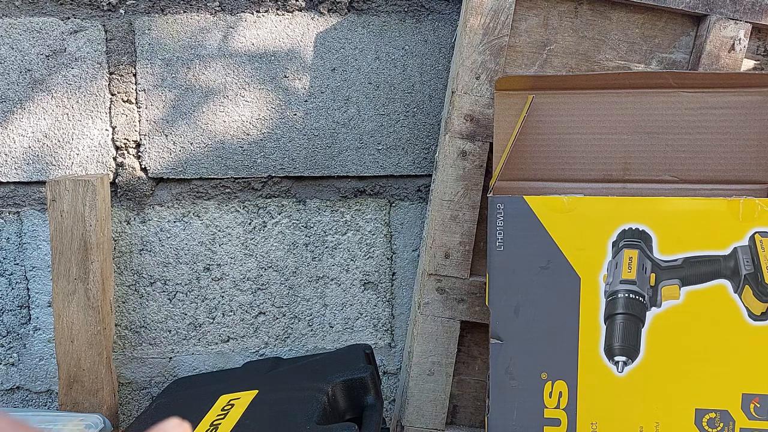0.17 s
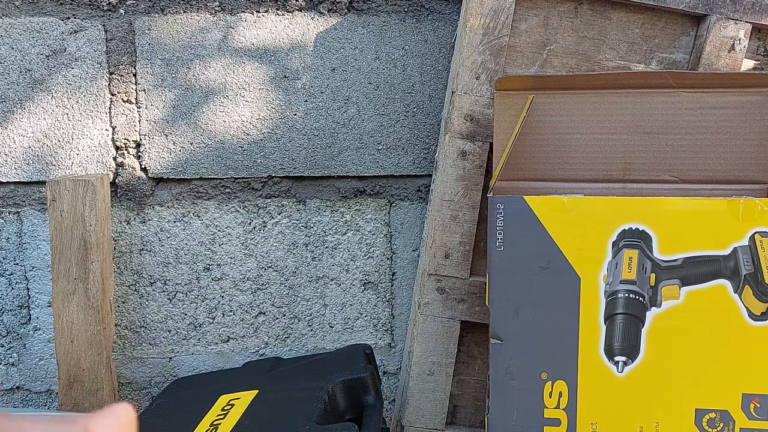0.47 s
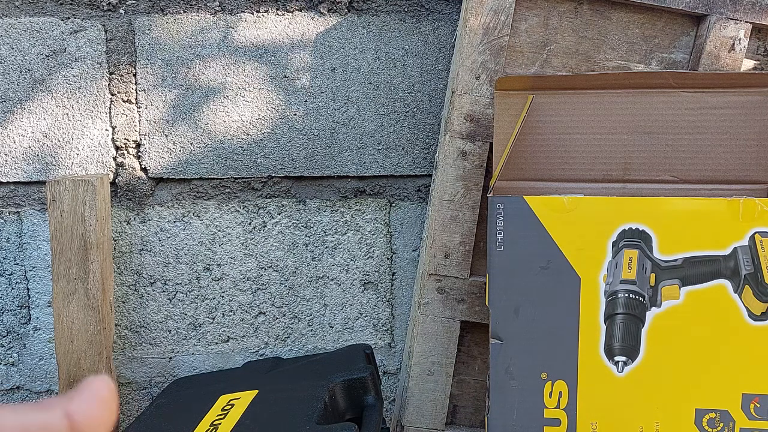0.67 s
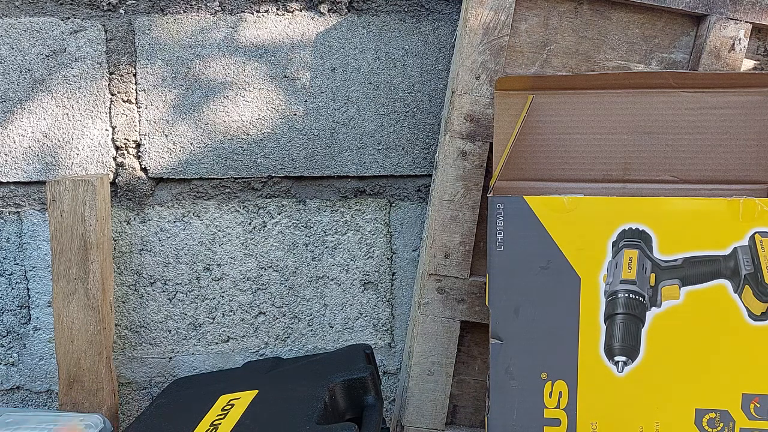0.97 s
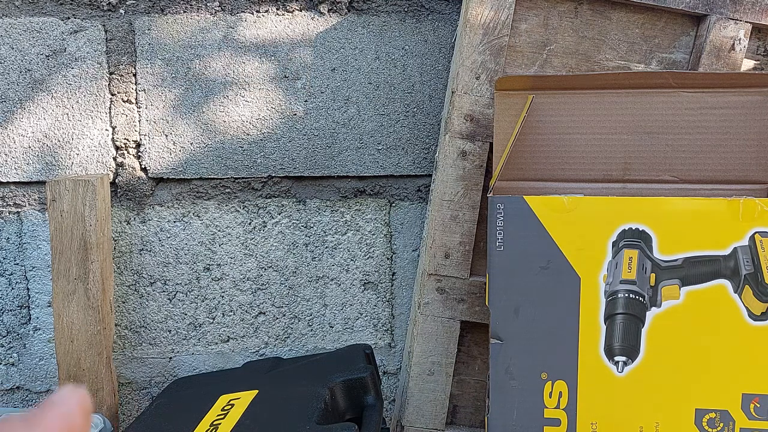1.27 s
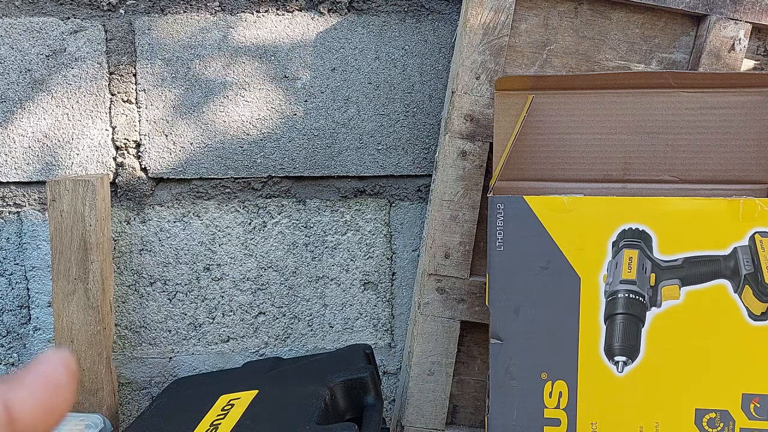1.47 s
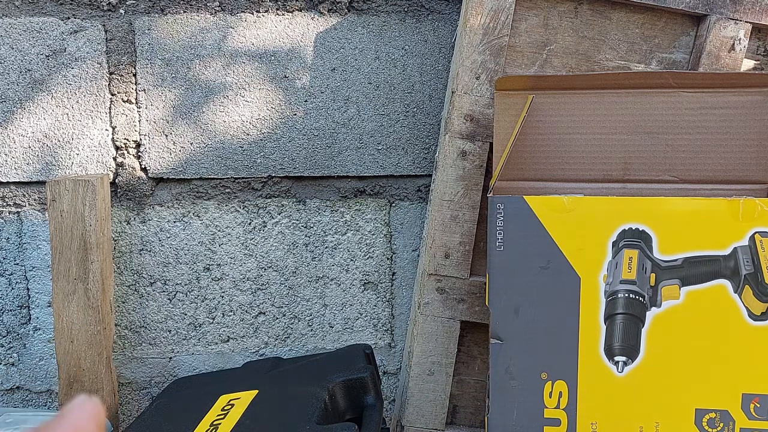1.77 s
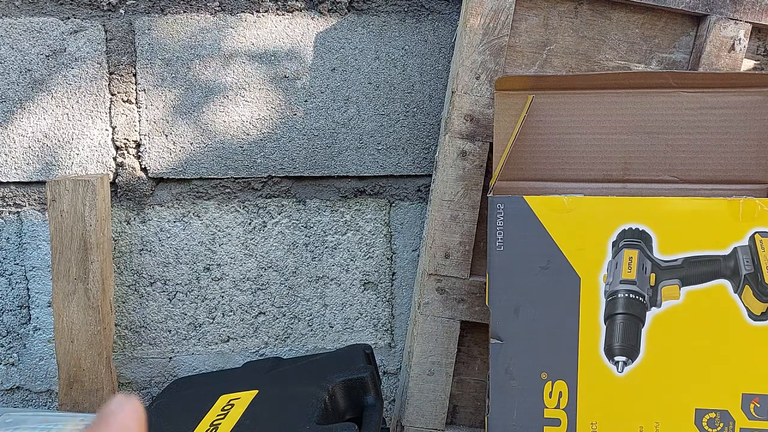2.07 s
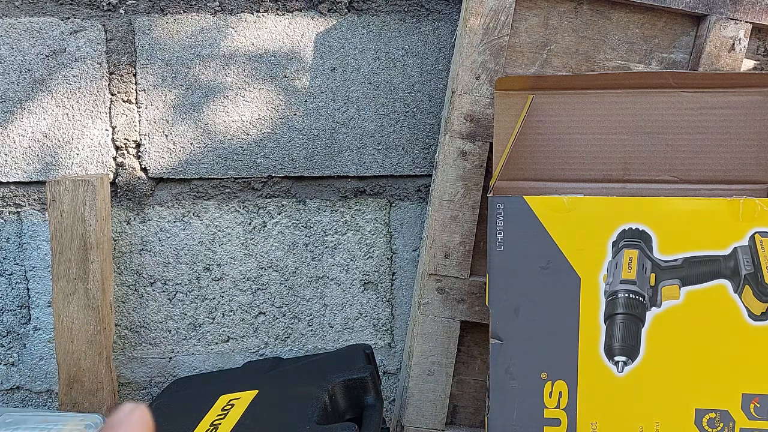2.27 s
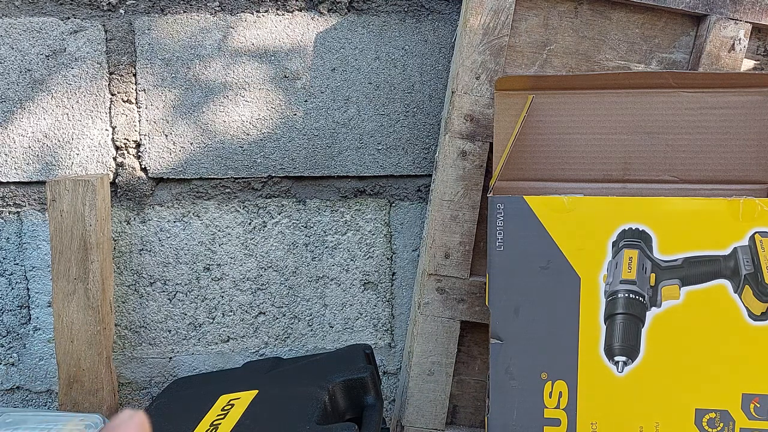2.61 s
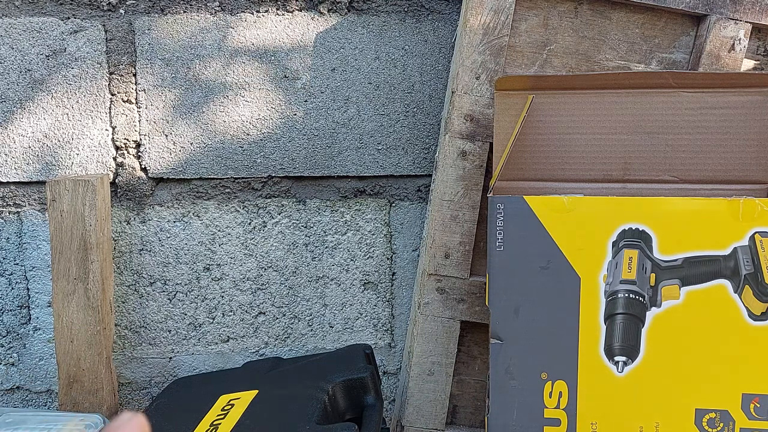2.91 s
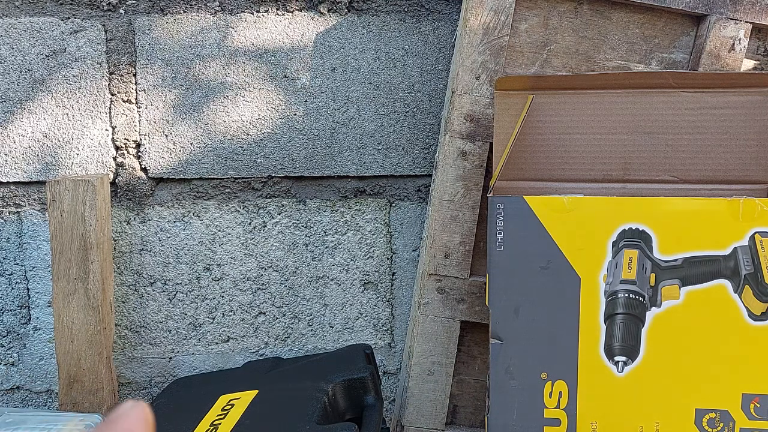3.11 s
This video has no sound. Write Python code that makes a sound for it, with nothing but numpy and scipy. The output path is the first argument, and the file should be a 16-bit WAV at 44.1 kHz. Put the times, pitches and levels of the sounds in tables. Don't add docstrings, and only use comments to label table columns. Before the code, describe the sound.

Three brief drill bursts, bright and ratchety with a thin motor whine, each ending abruptly in knocks; soft grip rubbing and one tiny squeak in the gaps. Close stereo pickup outdoors, louder left, with faint insect hiss.

```python
import sys
import numpy as np
from scipy import signal
from scipy.fft import rfft, irfft, next_fast_len
from scipy.io import wavfile
from scipy.ndimage import uniform_filter1d, map_coordinates

SR = 44100
rng = np.random.default_rng(int(sys.argv[2]) if len(sys.argv) > 2 else 0)


def to_linear_factor(level_db):
    exponent = np.asarray(level_db, float) / 20
    return 10 ** exponent


def int16_out(signal):
    q = np.round(np.clip(np.atleast_2d(signal).T, -1, 1) * 32767)
    wavfile.write(sys.argv[1], SR, q.astype(np.int16))


N = 143325

# frequency in Hz, level in dB.
TRAFFIC_COLOUR = [(25, -37.5), (54, 1.5), (123, -4), (350, -22), (700, -37.5), (1200, -46)]
# time in seconds, level in dB.
TRAFFIC_LEVEL = [(0, -65), (2.4, -58.5), (3.1, -48.5)]
# frequency in Hz, likeness from 0 to 1.
FAR_LIKENESS = [(60, 0.62), (700, 0.1)]
# frequency in Hz, level in dB.
HISS_COLOUR = [(300, -4), (1500, -15), (3200, -27), (6200, -15), (8500, 0.5), (15000, -20)]
# frequency in Hz, level in dB.
LOW_INSECT_COLOUR = [(4100, -30), (4650, -1), (5100, 0), (5700, -28)]
HIGH_INSECT_COLOUR = [(9000, -23), (10400, -7), (11400, -1.5), (12800, -29)]
# time in seconds, level in dB.
LOW_INSECT_LEVEL = [(0, -80), (1.0, -89.5), (1.15, -73), (1.45, -68), (1.57, -73), (1.7, -68), (1.8, -59.5),
                    (1.89, -72.5), (1.97, -61.5), (2.07, -71), (2.17, -65.5), (2.3, -66), (2.47, -67),
                    (2.58, -59.5), (2.68, -67.5), (2.77, -55.5), (2.87, -68.5)]
HIGH_INSECT_LEVEL = [(0, -69), (1.6, -65), (2.85, -58.5)]
# time in seconds, pitch in Hz, level in dB.
BIRD_CALL = [(0, 1582, -82.5), (.1, 1574, -87), (.2, 1553, -77.5), (0.279, 1534, -76.5), (.62, 1510, -85.5),
             (.72, 1527, -97), (0.779, 1510, -99)]
# start in seconds, pitch in Hz, level in dB.
DOVE_COOS = [
    (0.689, 987, -90),
    (.98, 965, -83.5),
    (2.769, 690, -78),
]
# time in seconds, level in dB.
BREEZE_LEVEL = [(1.9, -82), (2.02, -65), (2.152, -63.5), (2.28, -66.5), (2.37, -59.5), (2.5, -68.5),
                (2.62, -86.5)]
# frequency in Hz, level in dB per Hz.
LEAF_COLOUR = [(1200, -16.5), (2200, -3.5), (4200, 2), (9000, -4), (14000, -2.5), (16000, -5)]
# frequency in Hz, difference in dB.
LEFT_LOUDER = [(200, 9), (900, 2), (2400, 2.5), (8100, 9.5), (15000, 11)]
# frequency in Hz, share from 0 to 1.
OTHER_FACE_SHARE = [(300, 1), (700, .5), (1500, 0.84), (3000, .9), (9000, .98)]
# time in seconds, level in dB.
RUB_LEVEL = [(0, -82.5), (.27, -82), (.62, -76), (.7, -108), (.86, -73), (.98, -85), (1.14, -102),
             (1.17, -61), (1.5, -74), (1.65, -67), (1.82, -71), (1.92, -85), (2.88, -111), (2.92, -52.5)]
# frequency in Hz, level in dB.
SKIN_COLOUR = [(500, -28.5), (1700, 1.5), (5000, 1), (13000, -12), (16000, -8)]
# time in seconds, pitch in Hz, level in dB.
SQUEAK_RISE = [(1.532, 4980, -77), (1.581, 5400, -55.5), (1.625, 7500, -45.5), (1.68, 7220, -44.5),
               (1.789, 7500, -85)]
# time in seconds, pitch in Hz, level in dB.
SQUEAK_FALL = [(1.672, 7400, -69), (1.69, 5620, -53), (1.709, 4320, -66)]
# start in seconds, body in dB, snap in dB.
FINGER_TICKS = [(0.2864, -50.5, -65), (.805, -53, -72.5), (0.832, -47, -50), (0.846, -42, -48),
                (0.8703, -33.5, -42), (1.164, -55.5, -67), (1.519, -59.5, -80), (1.567, -53, -90),
                (2.245, -60, -102), (2.899, -54, -56)]
# start in seconds, body in dB, snap in dB, ring in Hz.
BACKLASH_KNOCKS = [(.5185, -22, -35, 2370), (.533, -24.5, -51, 3670), (.5412, -27.5, -40.5, 2322),
                   (.56, -37.5, -67.5, 4450), (1.2055, -24.5, -41, 3420), (1.2165, -22, -31, 2360),
                   (1.362, -25.5, -38, 2920), (1.6033, -37.5, -43.5, 3160), (1.6395, -30, -35.5, 3300),
                   (2.9215, -43.5, -49, 2520), (2.9685, -22, -31.5, 2990), (2.9845, -23.5, -37, 1990),
                   (3.2043, -19, -30.5, 3120)]
# frequency in Hz, level in dB.
BODY_COLOUR = [(300, -20.5), (700, -6), (1500, -1), (3000, -2), (7000, -9.5), (12000, -22)]
SNAP_COLOUR = [(5000, -31.5), (9000, -6), (14500, 6.5), (16000, -14)]
# snap in dB, lowest frequency in Hz.
LIGHT_CONTACT = [(-62, 1400), (-50, 200)]
# start in seconds, level in dB, pitch in Hz.
LOW_THUDS = [(1.346, -32.5, 220), (1.408, -38.5, 280.5), (1.411, -48, 643), (1.42, -42.5, 340),
             (1.44, -41.5, 845), (2.236, -53, 700), (2.908, -36, 960), (3.202, -20.5, 776)]
# start in seconds,
# level in dB.
FAN_CATCHES = [(.344, -33), (.383, -25), (.428, -26), (.457, -25), (.501, -27)]
# start in seconds, level in dB, pitch in Hz.
CASING_PINGS = [(0.341, -31.5, 5020), (.371, -28, 4900), (.447, -19, 14800), (.492, -26, 5800),
                (1.235, -27.5, 5320), (1.2574, -15.5, 11920), (1.272, -15, 12000), (1.277, -31, 5290),
                (1.29, -34, 7200), (1.327, -19, 15100), (1.346, -23, 14800), (1.36, -26, 15100),
                (1.367, -24, 12240), (1.71, -39.5, 2700), (1.7097, -43, 3450), (1.71, -46, 4750),
                (1.855, -68, 11970), (1.97, -57, 12300), (3.0017, -18.5, 5650), (3.0317, -26, 5760),
                (3.051, -20, 5200), (3.084, -24, 5570), (3.086, -14, 6500), (3.093, -23, 5640),
                (3.093, -19, 8980), (3.112, -15.5, 7000), (3.122, -26, 5460), (3.138, -28, 5260),
                (3.156, -20, 6860), (3.1662, -21, 6670), (3.167, -19, 5780), (3.179, -27, 6700)]
# time in seconds, turns per second in Hz, level in dB.
SHAFT_SPIN = [(.315, 125, -64), (.345, 205, -47), (.38, 270, -45), (.46, 316, -45), (.55, 290, -54)]
# multiple of the shaft rate, level in dB.
SHAFT_HUMS = [(4.5, -3), (9, -7), (15, 8)]
# on in seconds, off in seconds.
TRIGGER_ON = [
    (0.295, .39),
    (1.174, 1.4),
    (2.934, 3.03),
]
# level in dB of each harmonic, lowest first.
WHINE_LEVELS = [-66, -62, -65, -60]
# time in seconds, pitch in Hz, level in dB.
GEAR_MESH = [(2.991, 5300, -41.5), (3.091, 5690, -27), (3.13, 5336, -39), (3.178, 5710, -33)]
# time in seconds, gear rattle in dB.
BLIP_LEVELS = [
    [(.312, -52.5), (.335, -32.5), (.38, -28), (.515, -26.5), (.545, -37.5), (.585, -76)],
    [(1.196, -55), (1.206, -29), (1.275, -24), (1.365, -26.5), (1.377, -39.5), (1.398, -60), (1.408, -66)],
    [(2.958, -44), (2.972, -27), (3.09, -24.5), (3.18, -27.5), (3.21, -34), (3.25, -81)],
]
# casing ring, treble and fan air, each in dB over the rattle.
BLIP_BALANCE = [
    (-5.5, -4, -15),
    (-5.5, -2.5, -13),
    (-9, -8.5, -30),
]
# frequency in Hz, level in dB per Hz.
GEAR_COLOUR = [(200, -16), (1000, -11.5), (1600, -4), (3000, -2.5), (6000, -2.5), (9000, -5.5), (12500, 0),
               (15700, -1)]
# frequency in Hz, width in Hz, level in dB.
CASING_RINGS = [(1590, 280, -0.5), (5270, 350, -4), (6890, 420, -1.5), (12400, 610, -7.5)]
# frequency in Hz, level in dB.
FAN_COLOUR = [(30, -16.5), (110, -13), (350, -14.5), (1200, -27)]


def unit(x):
    return x / np.sqrt(np.mean(x ** 2) + 1e-20)


def along(points, hz):
    f, v = np.transpose(points)
    return np.interp(np.log(hz + 1), np.log(f + 1), v)


def shut(points, hz):
    return to_linear_factor(along(points, hz)) * (hz > .8 * points[0][0])


def curves(rows):
    s, *cols = np.transpose(rows)
    return [np.interp(np.arange(N) / SR, s, c) for c in cols]


def wobble(rate):
    return map_coordinates(rng.standard_normal(N // 20), [np.arange(N) * rate / SR])


def gate(on, off, fade):
    t = np.arange(N) / SR
    return np.clip(np.minimum(t - on, off - t) / fade, 0, 1)


def filtered(x, response):
    m = next_fast_len(x.shape[-1] + 8192)
    return irfft(rfft(x, m) * response(np.fft.rfftfreq(m, 1 / SR)), m)[..., :x.shape[-1]]


def noise(colour, n=N, rows=()):
    return unit(filtered(rng.standard_normal((*rows, n)), lambda hz: shut(colour, hz)))


def tone(hz, blur_hz):
    return np.sqrt(2) * np.sin(2 * np.pi * np.cumsum(hz + blur_hz * wobble(440)) / SR)


def patchy(x, depth_db):
    z = signal.stft(x, nperseg=256)[2]
    field = rng.standard_normal(z.shape[-2:])
    field = uniform_filter1d(uniform_filter1d(field, size=8, axis=0), size=14, axis=1)
    return unit(signal.istft(z * to_linear_factor(depth_db * unit(field)), nperseg=256)[1][..., :N])


def far_stereo(colour):
    alike = lambda hz: np.clip(along(FAR_LIKENESS, hz), 0, 1)
    a, b = noise(colour), noise(colour)
    right = filtered(a, alike) + filtered(b, lambda hz: np.sqrt(1 - alike(hz) ** 2))
    return np.array([a, right])


def traffic():
    level = to_linear_factor(curves(TRAFFIC_LEVEL)[0] + 1.5 * wobble(20))
    return level * far_stereo(TRAFFIC_COLOUR) * to_linear_factor([[1.3], [-1.3]])


def air_hiss():
    return to_linear_factor(-74) * patchy(far_stereo(HISS_COLOUR), 1.9)


def insects():
    low = to_linear_factor(curves(LOW_INSECT_LEVEL)[0] + 2.2 * wobble(8.3)) * far_stereo(LOW_INSECT_COLOUR)
    high = to_linear_factor(curves(HIGH_INSECT_LEVEL)[0] + .7 * wobble(42)) * far_stereo(HIGH_INSECT_COLOUR)
    return low + high


def birds():
    hz, db = curves(BIRD_CALL)
    call = tone(hz, 32) + to_linear_factor(-11.0) * tone(hz / 2, 25)
    out = gate(-1, BIRD_CALL[-1][0], 0.054) * to_linear_factor(db + 6.8 * wobble(10)) * call
    coo_s = .1
    for s, pitch, level_db in DOVE_COOS:
        out += to_linear_factor(level_db) * gate(s, s + coo_s, 0.015) * tone(pitch + 25 * wobble(26), 40.0)
    return out * to_linear_factor([[-1.5], [1.5]])


def breeze():
    on = gate(BREEZE_LEVEL[0][0], BREEZE_LEVEL[-1][0], 0.025)
    flutter = to_linear_factor(1.3 * wobble(60)) * patchy(far_stereo(LEAF_COLOUR), 1.8)
    return on * to_linear_factor(curves(BREEZE_LEVEL)[0]) * flutter * to_linear_factor([[-1.8], [1.8]])


def near(faces):
    wall_db, wall_t60_s, lead_s = -16, .08, 0.0003665
    t = np.arange(SR // 6) / SR
    echoes = rng.standard_normal((2, len(t))) * to_linear_factor(-60 * t / wall_t60_s)
    tail = to_linear_factor(wall_db) * unit(echoes) / np.sqrt(len(t))
    other = lambda hz: np.clip(along(OTHER_FACE_SHARE, hz), 0, 1)
    right = filtered(faces, lambda hz: [np.sqrt(1 - other(hz) ** 2), other(hz)]).sum(axis=0)
    seen = np.array([faces[0], right])
    both = signal.fftconvolve(seen, tail + (t == 0), axes=1)[:, :N]

    def path(hz):
        level = to_linear_factor(np.outer([.3, -.7], along(LEFT_LOUDER, hz)))
        return level * np.exp(-2j * np.pi * np.outer([0, lead_s], hz))
    return filtered(both, path)


def hand():
    hiss = lambda hz, k: wobble(900) * tone(k * hz, k * 90)
    hz, db = curves(SQUEAK_RISE)
    on = gate(SQUEAK_RISE[0][0], SQUEAK_RISE[-1][0], 0.012)
    squeak = on * to_linear_factor(db) * (hiss(hz, 1) + to_linear_factor(-11.5) * hiss(hz, 2))
    hz, db = curves(SQUEAK_FALL)
    on = gate(SQUEAK_FALL[0][0], SQUEAK_FALL[-1][0], .006)
    squeak += on * to_linear_factor(db) * hiss(hz, 0.97)
    grip = patchy(noise(SKIN_COLOUR, rows=(2,)), 3)
    return to_linear_factor(curves(RUB_LEVEL)[0] + 6 + 2.2 * wobble(36)) * grip + squeak


def hits(rows):
    attack_s, ring_t60_s, ring_db = .0005, 0.0081, -2
    hit_t60_s, after_t60_s, after_db = .006, .045, -19
    out, t = np.zeros((2, N + SR)), np.arange(SR // 10) / SR
    fall = to_linear_factor(-60 * t / hit_t60_s) + to_linear_factor(after_db - 60 * t / after_t60_s)
    fall *= 1 - np.exp(-(t / attack_s) ** 2)
    for s, body_db, snap_db, hz in rows:
        ring = to_linear_factor(ring_db - 60 * t / ring_t60_s) * np.sin(2 * np.pi * hz * t) * (1 - np.exp(-t / attack_s))
        low_hz = np.interp(snap_db, *np.transpose(LIGHT_CONTACT))
        no_bass = lambda f: 1 / np.sqrt(1 + (low_hz / (f + 1)) ** 8)
        body = filtered(noise(BODY_COLOUR, len(t), rows=(2,)), no_bass)
        snap = fall * noise(SNAP_COLOUR, len(t), rows=(2,))
        hit = to_linear_factor(body_db + 11.5) * (fall * body + ring) + to_linear_factor(snap_db + 14) * snap
        out[:, round((s - attack_s) * SR):][:, :len(t)] += hit
    return out[:, :N]


def finger_ticks():
    ring_hz = 1620
    return hits([(*row, ring_hz) for row in FINGER_TICKS])


def backlash_knocks():
    return hits(BACKLASH_KNOCKS)


def thuds():
    catch_push_db, catch_hz, scrape_s = -12, 118.4, 0.0033
    longest_t60_s, cycles, puff_db = .05, 18, -6
    out, t = np.zeros(N + SR), np.arange(SR // 10) / SR
    catches = [(s, db + catch_push_db, catch_hz) for s, db in FAN_CATCHES]
    for s, db, hz in LOW_THUDS + catches:
        puff = to_linear_factor(puff_db) * noise([(hz / 2, -12), (hz, 0), (2.6 * hz, -9), (6 * hz, -60)], len(t))
        fall = to_linear_factor(db + 2.5 - 60 * t / min(longest_t60_s, cycles / hz)) * (1 - np.exp(-t / .003))
        out[round(s * SR):][:len(t)] += fall * (np.sin(2 * np.pi * hz * t) + puff)
    swell = t / scrape_s * np.exp(-(t / scrape_s) ** 2)
    for s, db in FAN_CATCHES:
        out[round(s * SR):][:len(t)] += to_linear_factor(db + 9.0) * swell * noise(SNAP_COLOUR, len(t))
    return out[:N]


def pings():
    ping_s, spread = .0018, .05
    out, t = np.zeros(N + SR), np.arange(SR // 50) / SR
    swell = 2 * t / ping_s * np.exp(-(t / ping_s) ** 1.5)
    for s, db, hz in CASING_PINGS:
        draws = rng.uniform(-0.95, 1, (3, 2))
        ring = sum(np.sin(2 * np.pi * (hz * (1 + spread * u) * t + v)) for u, v in draws)
        out[round(s * SR):][:len(t)] += to_linear_factor(db) * unit(ring) * swell
    return out[:N]


def switching_whine():
    switch_hz = 3887
    whine = sum(to_linear_factor(db) * tone((k + 1) * switch_hz, 5.5) for k, db in enumerate(WHINE_LEVELS))
    return whine * sum(gate(on, off, 0.0069) for on, off in TRIGGER_ON)


def shaft():
    hz, db = curves(SHAFT_SPIN)
    start, end = SHAFT_SPIN[0][0], SHAFT_SPIN[-1][0]
    hums = sum(to_linear_factor(db + d + 0.56 * wobble(55)) * tone(k * hz, 7 * k) for k, d in SHAFT_HUMS)
    sleeve = to_linear_factor(db - 3.5 + 1.5 * wobble(33)) * tone(hz, 12)
    return gate(start, end, 0.011) * hums + gate(.365, end, .03) * sleeve


def gear_mesh():
    hz, db = curves(GEAR_MESH)
    mesh = sum(to_linear_factor(db + 2.5 * wobble(150)) * tone(k * hz, 150) for k in (1, 1.21))
    return gate(GEAR_MESH[0][0], GEAR_MESH[-1][0], 0.009) * mesh


def casing(hz):
    total = 0
    for k, (centre, width, db) in enumerate(CASING_RINGS):
        total = total + (-1) ** k * to_linear_factor(db) * 1j * hz * width / (centre ** 2 - hz ** 2 + 1j * hz * width)
    return total


def gears():
    rattle, air = np.zeros((2, N)), np.zeros(N)
    for rows, (ring_db, bright_db, air_db) in zip(BLIP_LEVELS, BLIP_BALANCE):
        level_db, = curves(rows)
        on = gate(rows[0][0], rows[-1][0] + .01, .004)
        clumps_db = [[2.5 * wobble(900) + .3 * wobble(130)], [2.5 * wobble(110)]]
        teeth = rng.standard_normal((2, 2, N)) * to_linear_factor(clumps_db)
        treble = [(7000, 0.0042), (11000, bright_db)]
        plain = unit(filtered(teeth[0], lambda hz: shut(GEAR_COLOUR, hz) * to_linear_factor(along(treble, hz))))
        ringing = unit(filtered(teeth[1], casing))
        rattle += on * to_linear_factor(level_db) * (plain + to_linear_factor(ring_db) * ringing)
        late_db = np.roll(level_db, SR // 40)
        air += on * to_linear_factor(late_db + air_db + 4.2 * wobble(40.2)) * noise(FAN_COLOUR)
    return rattle, air


def scene():
    yard = traffic() + air_hiss() + insects() + birds() + breeze()
    handling = hand() + finger_ticks()
    rattle, air = gears()
    drill = rattle + shaft() + gear_mesh() + switching_whine() + backlash_knocks() + thuds() + pings()
    return yard + near(handling + drill) + air * to_linear_factor([[0], [-14]])


def low_pass(x):
    return signal.sosfilt(signal.butter(12, 16980, fs=SR, output="sos"), x)


def record(dry):
    top_hz = 15780
    edge = [(top_hz - 150, 0), (top_hz + 150, -38)]
    mix = filtered(dry, lambda hz: to_linear_factor(along(edge, hz)))
    return low_pass(mix)


dry = scene()
out = record(dry)
int16_out(out)
```